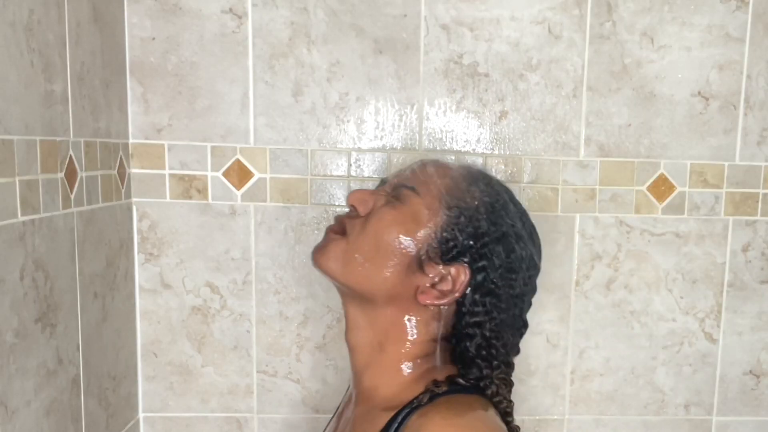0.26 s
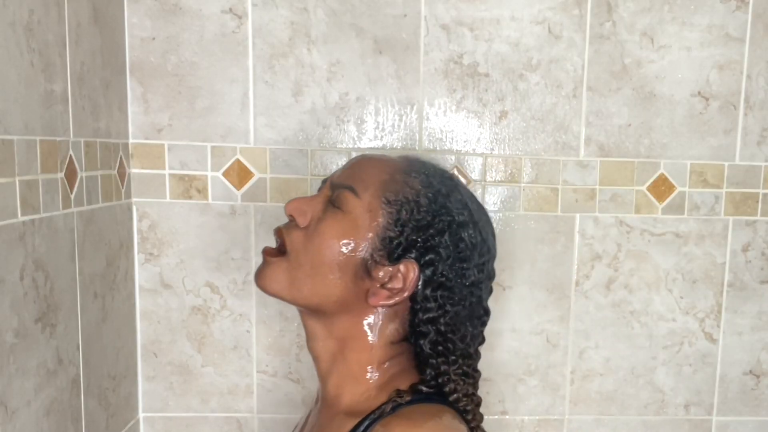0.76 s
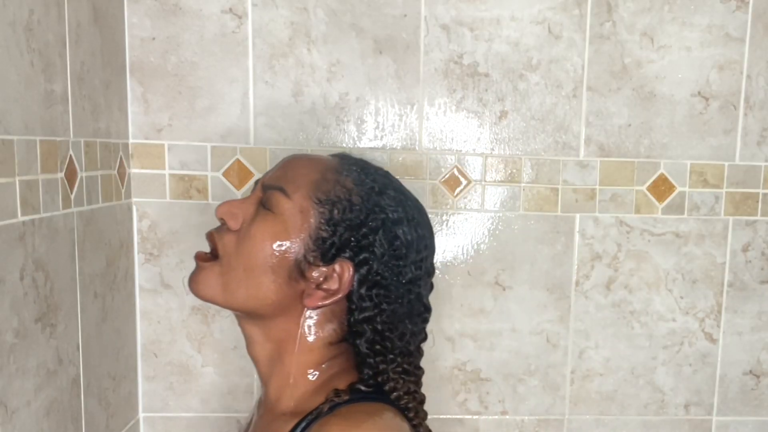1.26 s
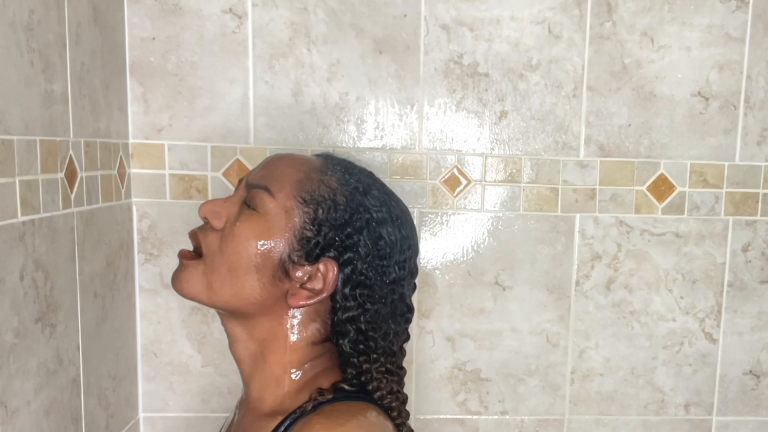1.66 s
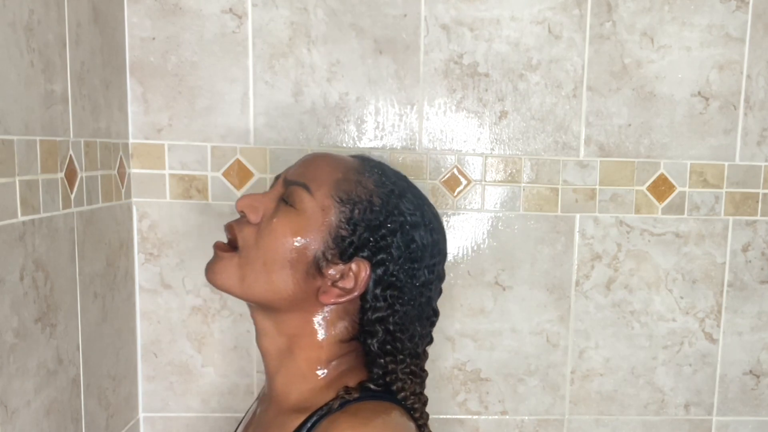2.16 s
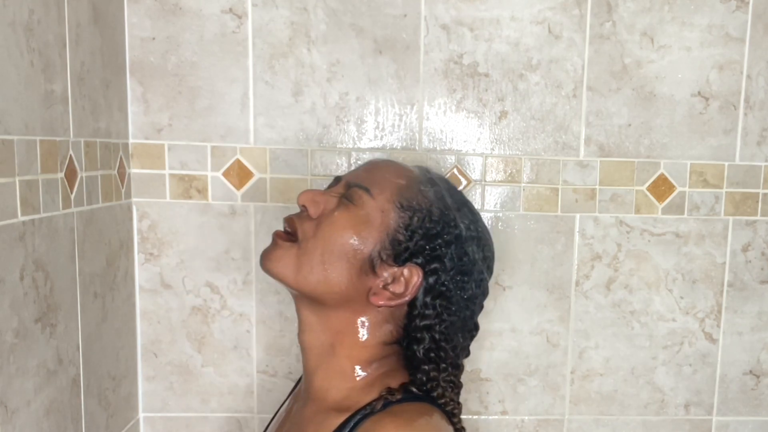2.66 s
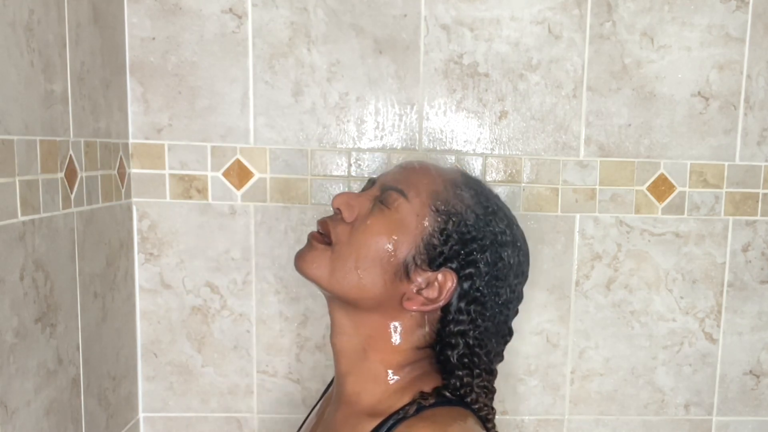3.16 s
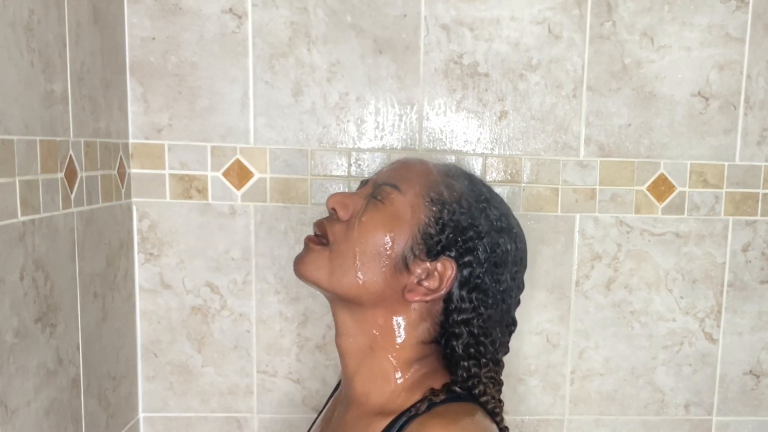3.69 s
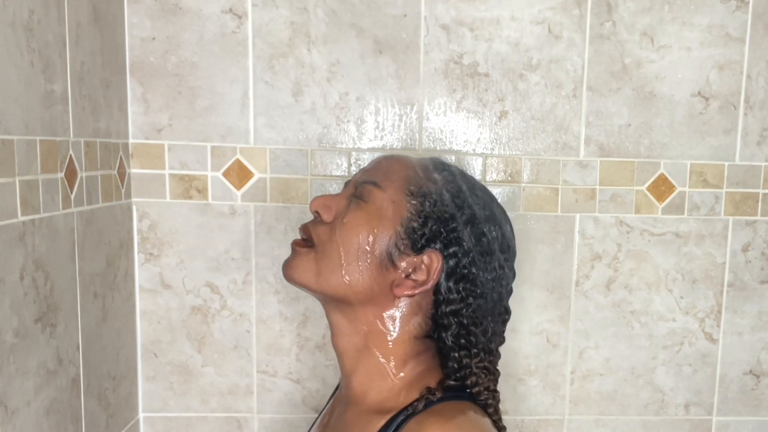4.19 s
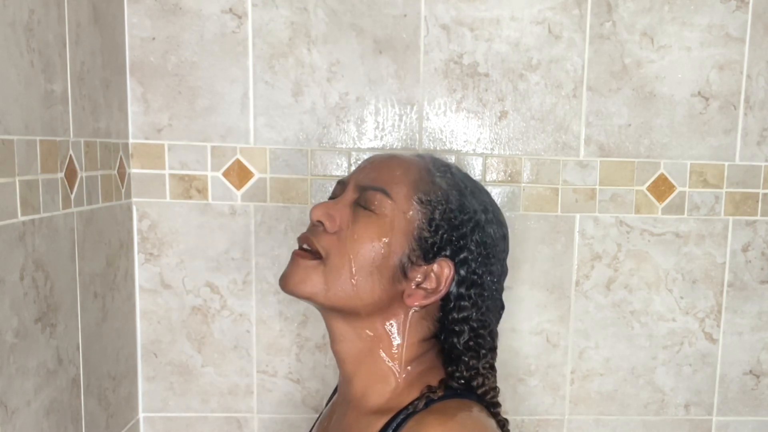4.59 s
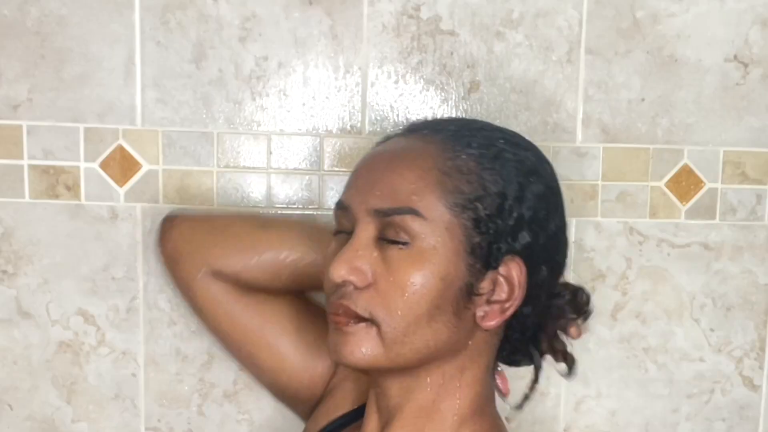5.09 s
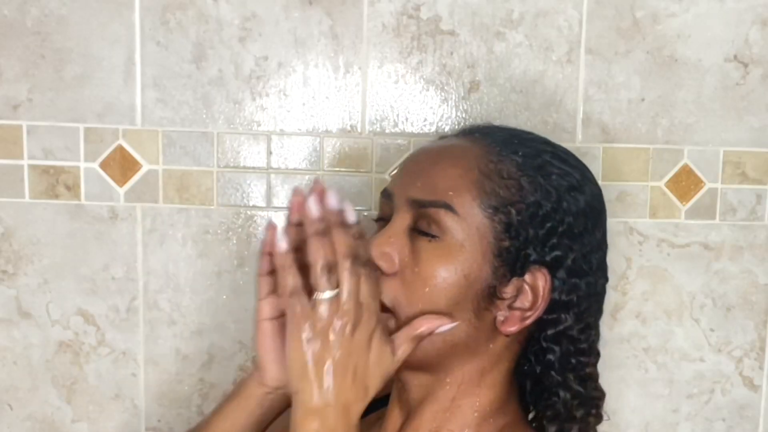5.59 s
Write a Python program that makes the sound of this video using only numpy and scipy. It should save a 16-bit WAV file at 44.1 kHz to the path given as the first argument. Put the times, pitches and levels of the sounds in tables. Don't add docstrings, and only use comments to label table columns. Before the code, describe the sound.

Bright, close shower spray with drumming runoff and splashing drops for five seconds, suddenly replaced by faint rubs and pats of wet palms.

```python
import sys
import numpy as np
from scipy import signal
from scipy.fft import rfft, irfft, next_fast_len
from scipy.io import wavfile
from scipy.ndimage import uniform_filter1d, minimum_filter1d

SR = 44100
rng = np.random.default_rng(int(sys.argv[2]) if len(sys.argv) > 2 else 0)


def amp(db):
    return 10 ** (np.asarray(db, float) / 20)


def write(x):
    x = np.atleast_2d(x).T
    wavfile.write(sys.argv[1], SR, np.round(np.clip(x, -1, 1) * 32767).astype(np.int16))


N = 257528

SPRAY_LAYER_HZ = [220, 1100, 4200, 9000]
# (frequency [Hz], density [dB per Hz])
SPRAY_COLOUR = [(40, -23.5), (80, -8.5), (120, -5), (250, -4.5), (500, -2), (700, -4), (1000, -3.5),
                (2100, -7), (2500, -10.5), (4000, -12.5), (6000, -10.5), (7500, -11.5), (10000, -9),
                (13000, -12), (16000, -15)]
# (time [s], flow running off the hair [dB], jet striking bare skin [dB])
FLOW = [(0.0, 2, 2), (0.1, -6.5, 1.5), (0.17, 0.5, 0), (0.31, -5, -2), (0.45, -3.5, -4.5), (0.67, -3, -2),
        (0.82, -1.5, -4.5), (0.95, -3.5, -3.5), (1.4, 1, 0.5), (2.0, 2.5, 2), (2.45, 2.5, -2),
        (3.15, 0, 2.5), (3.58, -2.5, -2.5), (3.8, -2.5, -2.5), (4.07, -3, -3), (4.35, -2, -2),
        (4.55, -1, -2), (5.0, -2.5, -1)]
# (share of flow [1], share of jet [1], random surge [dB])
FOLLOWS = [
    (0.83, -0.36, 0.56),
    (0.37, -0.16, .5),
    (.1, 0.78, 1.4),
    (0.91, 0.28, 1.4),
]
# (time [s], level over the drumming [dB], length [s])
GUSHES = [(.5, 2, 0.037), (.66, 5, 0.065), (.8, 9, .06), (1.03, 5, 0.073), (1.53, 4, 0.04),
          (2.0, -0.5, 0.044), (2.2, 2, 0.034), (2.45, 4, 0.086), (2.75, 0, .06), (2.95, 4, 0.16),
          (4.33, 0.5, 0.026), (4.75, 0, 0.045)]
# (start [s], end [s])
FADE = (5.058, 5.093)

# (time [s], peak level [dB], pitch [Hz], tail level [dB])
SMACKS = [(0.161, -30, 7430, -11), (0.402, -15, 6500, -2), (0.692, -25.5, 7450, -5),
          (0.786, -23.5, 7700, -5), (0.8856, -20.5, 8630, -4), (1.2116, -26.5, 8240, 1),
          (1.5246, -20.5, 8900, 1), (1.815, -14.5, 7000, -1), (2.0118, -19.5, 7800, -5.5),
          (2.2897, -14, 8500, -2.5), (2.4404, -30, 8450, 5), (2.5371, -24, 7500, -4),
          (2.5945, -16, 8600, -3.5), (2.6464, -19.5, 8650, -5), (2.8298, -20, 9300, 0),
          (3.1248, -23, 5450, -2.5), (3.3817, -22.5, 8700, -2.5), (3.695, -39, 7390, 3),
          (3.769, -14.5, 8200, -1), (4.4084, -20.5, 9350, -5), (4.5291, -22.5, 8800, -0.5),
          (4.6453, -31, 8960, -5), (4.7461, -27, 7430, -2), (4.939, -24.5, 8830, 0.5)]
# (time [s], peak level [dB])
SPITS = [(0.161, -32.5), (0.4015, -34), (0.544, -30), (0.8854, -22), (1.3139, -39.5), (1.4222, -27),
         (1.6382, -30), (1.6601, -22), (1.735, -25), (1.8148, -21), (2.0118, -24), (2.1969, -28),
         (2.2189, -35), (2.8295, -41), (3.3817, -27), (3.6581, -24), (3.695, -23), (3.7693, -24),
         (3.899, -24), (4.4084, -22), (4.6453, -37), (4.747, -23), (4.8259, -28), (4.9347, -33)]
SPIT_SOUND = 12500, .48, 4.8, .05
# (time [s], peak level [dB],
# pitch [Hz], relative width [1], tail level [dB])
PLOPS = [(.4038, -24, 4000, .2, 1), (.0887, -37, 2050, .2, -6), (.1336, -32, 2220, .2, -8),
         (.3651, -33, 1540, .25, 0), (1.292, -36, 1150, .25, -2), (3.6316, -35, 1040, .25, -2),
         (4.817, -35, 1180, .25, -2), (3.7598, -32, 7500, .4, -8), (3.7945, -27, 7600, .3, -6),
         (.4165, -31, 3000, 0.22, 2.5), (.41, -27, 5700, .22, 5.5), (3.142, -37, 3000, 0.148, 1.5),
         (.4021, -8, 8000, .32, -9.5), (1.8155, -20.5, 8000, .25, 0), (1.6, -22.5, 8300, 0.23, 0),
         (4.3165, -31.5, 3150, .06, -12), (4.3225, -30, 3300, .055, -12), (1.0251, -19, 8400, .27, 2),
         (4.4, -26, 7650, 0.11, -4.5)]
# (time [s], level over its rest [dB], length [s])
FLARES = [(.335, 7.5, .03), (1.53, 4, 0.066), (1.24, 4, .05), (2.12, 3, .06), (2.33, -5, .12),
          (2.6, 4, 0.1), (2.8, 3, .08), (3.16, 2, 0.034), (3.5, 4, .07), (3.92, 3, .06), (4.32, 5, 0.017),
          (4.4, 3, .05)]

HANDS_LAYER_HZ = [
    600,
    2200,
    6500,
    120,
]
# (frequency [Hz], density [dB per Hz])
HANDS_COLOUR = [(30, -5), (68, 1), (296, -14), (456, 0.5), (595, -18), (776, -4), (1380, -13.5),
                (1640, -15.5), (2410, -15), (6000, -26), (9500, -31), (13000, -34), (16000, -38)]
# (start [s], length [s], level [dB], brightness [dB])
RUBS = [(5.113, 0.028, -60.5, -7), (5.18, .03, -60, -9), (5.246, 0.036, -61, -11.5),
        (5.307, 0.016, -59, -8), (5.338, 0.024, -53, -8.5), (5.428, 0.034, -73, -11), (5.53, .02, -69, -20),
        (5.56, 0.03, -58.5, -11.5), (5.628, 0.038, -70, 6), (5.704, 0.019, -60, -7), (5.766, 0.032, -73, 0),
        (5.81, .03, -62.5, -6)]
STILL_DB = [
    -85,
    -111,
    -106,
    -69,
]
# (time [s], peak level [dB], cavity pitch [Hz])
CUPS = [(5.119, -53, 664), (5.188, -52.5, 685), (5.254, -58, 1400), (5.311, -50.5, 795), (5.344, -58, 775),
        (5.357, -52, 855), (5.533, -62, 750), (5.562, -50.5, 765), (5.58, -55, 800), (5.619, -57, 486),
        (5.709, -50.5, 734), (5.811, -54, 748)]
CUP_SOUND = .2, 5.5, .08
# (time [s], peak level [dB])
SLAPS = [
    (5.1128, -48),
    (5.3108, -55),
    (5.3438, -52),
    (5.562, -39.5),
    (5.7079, -56),
    (5.8112, -45),
]
SLAP_SOUND = 7000, 2, 2, -1.5
# (start [s], length [s], level [dB], centre [Hz], width [Hz])
SQUEAKS = [(5.635, 0.056, -78, 4700, 500), (5.652, .04, -78, 8700, 500), (5.768, .04, -75.5, 4000, 500),
           (5.768, .04, -79, 7300, 500), (5.254, .055, -62, 1420, 160), (5.258, .04, -66, 1020, 200),
           (5.262, .04, -68, 480, 120), (5.311, .075, -62, 460, 100), (5.345, .03, -66, 2450, 400),
           (5.563, .03, -60, 820, 200), (5.568, .1, -65, 360, 110), (5.69, .07, -67, 450, 100),
           (5.71, .012, -64, 1300, 500), (5.812, .03, -64, 750, 200)]
RUB_RISE_S, RUB_RELEASE_DB_PER_S = 0.0046, 354

# (frequency [Hz], density [dB per Hz])
RUMBLE_COLOUR = [(15, -25.5), (25, -17), (50, -13.5), (68, -3), (85, -11), (120, -30), (300, -67.5)]
# (frequency [Hz], width [Hz], level over the colour [dB])
STALL = [(66, 14, 2.5), (100, 14, 4), (142, 21, 12), (212.6, 56, 9), (325.5, 10, 12), (361.5, 16, 10),
         (461, 16, 9), (647, 14, 1.5), (774, 20, 1), (1224, 18, 4), (1417, 36, 4.5), (2203, 25, 7.5),
         (6513, 28, 9), (7000, 86, 5), (7430, 80, 12), (7810, 60, 7), (9350, 74, 3.5)]
# (frequency [Hz], time to fall 60 dB [s])
TILES = [(200, 0.62), (1000, 0.29), (4000, 0.38), (8000, 0.48), (15000, 0.12)]
# (frequency [Hz], correlation [0-1])
SAME = [(30, .85), (60, 0.6), (140, 0.97), (330, 0.52), (500, 0.38), (800, 0.033), (20000, 0.012)]
# (frequency [Hz], part [0-1])
ONE_SPOT = [(100, 0.13), (250, 0.26), (700, 0.64), (1500, 0.59), (3000, 0.65), (6000, 0.49), (16000, 0.19)]

# (frequency [Hz], share [0-1])
SHARED = [(20, 0), (6000, 0.013), (6900, .5), (7800, 0.4), (8200, 1), (20000, 1)]
# (frequency [Hz], scrambled part [0-1])
SMEAR = [(6000, 0), (8000, .4), (11000, 0.33), (15500, 0.54)]
# (frequency [Hz], threshold relative to the local mean [dB])
DROPOUT = [(2000, -30), (2500, -3.5), (2900, -4.2), (3300, -7), (3700, -4.4), (4300, -2.2), (5300, -2.2),
           (6500, -5), (16000, -12)]


def spray_layers():
    t = np.arange(0, FADE[1], .01)
    s, flow_db, jet_db = np.transpose(FLOW)
    of_flow, of_jet, surge_db = np.transpose(FOLLOWS)[:, :, None]
    layers = of_flow * np.interp(t, s, flow_db) + of_jet * np.interp(t, s, jet_db)
    layers += surge_db * waver(t, per_s=12, count=4)
    layers[0] += swells(t, GUSHES)
    return np.transpose([t, *layers])


def spray():
    water = churn(spray_layers(), SPRAY_LAYER_HZ, patchy_db=1.25, flicker_db=0.74)
    return amp(-35.5) * in_stall(water, SPRAY_COLOUR, modes_share=1)


def drops():
    smacks = [(s, db, hz, .43 + .006 * (db + 19.5), tail_db, .087) for s, db, hz, tail_db in SMACKS]
    spits = [(*row, *SPIT_SOUND) for row in SPITS]
    plops = [(*row, .1) for row in PLOPS]
    return hits(smacks + spits + plops, wet_db=8.0, early=0.78)


def droplets(per_s=120, spread_db=10.0, low_hz=4500, top_hz=11000, level_db=-52, wet_db=13.5):
    size = amp(np.minimum(spread_db * rng.exponential(1, N), 18))
    size *= rng.random(N) < per_s / SR
    band = signal.butter(2, [low_hz, top_hz], "band", fs=SR, output="sos")
    ticks = signal.sosfilt(band, size * rng.choice([-1., 1.], N))
    room = signal.fftconvolve(ticks[None], tiles(gap_s=.002), axes=1)[:, :N]
    return amp(level_db) * evened(ticks + amp(wet_db) * room)


def whistle():
    t = np.arange(N) / SR
    s = t[::200]
    db = -54 + 1.2 * waver(s, per_s=6.0, count=1)[0] + swells(s, FLARES)
    r = np.exp(-np.pi * 24 / SR)
    slow = signal.lfilter([1 - r], [1, -r], complex_noise(N))
    slow = slow / abs(slow) ** .65
    return np.interp(t, s, amp(db)) * evened((slow * np.exp(2j * np.pi * 3295 * t)).real)


def rub_layers():
    t = np.arange(FADE[1], N / SR, .002)
    start, length, db, bright_db = np.transpose(RUBS)[:, :, None]
    stroke = amp(db) * stroke_shape(t, start, length)
    power = [(stroke ** 2 * amp(2 * share * bright_db)).sum(0) for share in (0, 0.36, 1)]
    power.append(0 * t)
    still = amp(2 * np.array(STILL_DB))[:, None]
    return np.transpose([t, *10 * np.log10(power + still)])


def rubbing():
    rub = churn(rub_layers(), HANDS_LAYER_HZ, patchy_db=3.0, flicker_db=2.0) * (np.arange(N) / SR > FADE[1])
    return amp(-69.5) * in_stall(rub, HANDS_COLOUR, modes_share=0.57)


def palms():
    cups = [(*row, *CUP_SOUND) for row in CUPS]
    slaps = [(*row, *SLAP_SOUND) for row in SLAPS]
    return hits(cups + slaps, wet_db=1.0, early=.1)


def squeaks():
    t, out = np.arange(N - SR, N) / SR, 0
    for s, length, db, hz, width in SQUEAKS:
        r = np.exp(-np.pi * width / SR)
        slow = signal.lfilter([1], [1, -2 * r, r * r], complex_noise(SR))
        tone = evened((slow * np.exp(2j * np.pi * hz * t)).real)
        out = out + amp(db) * stroke_shape(t, s, length) * tone
    return np.pad(out, ((0, 0), (N - SR, 0)))


def stroke_shape(t, start, length):
    release_db = RUB_RELEASE_DB_PER_S * np.maximum(t - start - length, 0)
    return np.clip((t - start) / RUB_RISE_S, 0, 1) * amp(-release_db)


def rumble():
    t = np.arange(N) / SR
    db = -59.5 - 1.5 * t + swells(t, [(0, 12.5, 0.099)])
    return amp(db) * in_stall(rng.standard_normal((3, N)), RUMBLE_COLOUR, modes_share=0)


def microphone_hiss():
    return amp(-86) * rng.standard_normal((2, N))


def churn(rows, centres, patchy_db, flicker_db):
    frames, hz = N // 128 + 5, np.fft.rfftfreq(512, 1 / SR)
    s, *levels = np.transpose(rows)
    t = np.arange(frames) * 128 / SR
    layers = np.array([np.interp(t, s, v - np.mean(v)) for v in levels])
    share = np.array([read(sorted(zip(centres, one)), hz) for one in np.eye(len(centres))])
    *parts, patches, flicker = rng.standard_normal((frames, 257, 8)).T
    patches = evened(uniform_filter1d(uniform_filter1d(patches, size=7, axis=0), size=20, axis=1))
    flicker = evened(uniform_filter1d(uniform_filter1d(flicker, size=70, axis=0), size=3, axis=1))
    noise = np.array(parts[:3]) + 1j * np.array(parts[3:])
    z = noise * amp(share.T @ layers + patchy_db * patches + flicker_db * flicker)
    return signal.istft(z, nperseg=512, noverlap=384)[1][:, :N]


def hits(rows, wet_db, early):
    out = np.zeros((2, N + SR))
    rooms = [tiles(gap_s=.0005, early=early) for _ in range(8)]
    for k, (s, db, hz, spread, tail_db, fall) in enumerate(rows):
        spread, fall = np.clip(spread, .05, 2), np.clip(fall, 0, .6)
        u = np.arange(-2.5, 14, hz * spread * np.pi / SR)
        late = np.maximum(u, 0)
        onset = np.exp(-np.minimum(u, 0) ** 2)
        decay = (1 - fall) * np.exp(-late ** 2) + fall * np.exp(-late / 2.1)
        phase = np.cumsum(2 * np.pi * hz / SR * (1 - fall * np.tanh(late / 5.1)))
        burst = amp(db) * onset * decay * np.cos(phase)
        room = signal.fftconvolve(burst[None], rooms[k % len(rooms)], axes=1)
        sound = amp(wet_db + tail_db) * room
        sound[:, :len(u)] += burst
        start = round((s + .0011 - .6 / (hz * spread)) * SR)
        out[:, start:][:, :sound.shape[1]] += sound
    return out[:, :N]


def in_stall(x, colour, modes_share):
    hz = np.fft.rfftfreq(N, 1 / SR)
    modes_db = sum(db / (1 + (2 * (hz - f) / width) ** 2) for f, width, db in STALL)
    echoes = rfft(tiles(gap_s=0.001006), N)
    echoes /= np.sqrt(uniform_filter1d(abs(echoes) ** 2, size=3000, axis=1))
    spot = np.clip(read(ONE_SPOT, hz), 0, 1)
    z = rfft(x) * amp(read(colour, hz) + modes_share * modes_db)
    left, other = np.sqrt(1 - spot ** 2) * z[:2] + spot * echoes * z[2]
    same = np.clip(read(SAME, hz), 0, 1)
    right = same * left + np.sqrt(1 - same ** 2) * other
    return evened(irfft(np.array([left, right]), N))


def tiles(gap_s, early=0.72, early_s=0.0064):
    echoes = np.zeros((2, SR // 3))
    at = np.arange(round(gap_s * SR), SR // 3 - 12, 12)
    at = at + rng.integers(0, 12, (2, len(at)))
    strength = 1 + early * np.exp(-at / SR / early_s)
    np.put_along_axis(echoes, at, rng.choice([-1., 1.], at.shape) * strength, 1)
    hz, t, z = signal.stft(echoes, SR, nperseg=256)
    tail = signal.istft(z * amp(-60 * t / read(TILES, hz)[:, None]), SR, nperseg=256)[1]
    return tail / np.linalg.norm(tail[0])


def waver(t, per_s, count):
    hz = np.geomspace(.5, per_s, 24)[:, None]
    phases = rng.random((count, 24))
    return np.array([evened((np.sin(2 * np.pi * (hz * t + p[:, None])) / hz ** 0.14).sum(0)) for p in phases])


def swells(t, rows):
    return sum(db * np.exp(-((t - at) / length) ** 2) for at, db, length in rows)


def complex_noise(n):
    return rng.standard_normal((2, n)) + 1j * rng.standard_normal((2, n))


def evened(x):
    return x / np.sqrt(np.mean(x ** 2) + 1e-20)


def read(points, hz):
    f, value = np.transpose(points)
    return np.interp(np.log(hz + 1), np.log(f + 1), value)


def scene():
    t = np.arange(N) / SR
    shower = spray() + drops() + droplets() + whistle() + rumble()
    hands = rubbing() + palms() + squeaks() + microphone_hiss()
    return shower * np.interp(t, FADE, [1, 0]) + hands * (t > FADE[1])


def low_pass(x):
    return signal.sosfilt(signal.butter(12, 16370, fs=SR, output="sos"), x)


def record(dry):
    size = next_fast_len(N + 4096)
    hz = np.fft.rfftfreq(size, 1 / SR)
    left, right = rfft(dry, size) * np.clip((15830 - hz) / 250, 0, 1)
    shared = np.clip(read(SHARED, hz), 0, 1)
    lead = np.exp(2j * np.pi * (hz - 12197) / 3976)
    right = np.sqrt(1 - shared ** 2) * right + shared * lead * left
    mid_side = irfft(np.array([left + right, left - right]) / 2, size)[:, :N]
    f, t, z = signal.stft(mid_side, SR, nperseg=1024)
    smear = np.clip(read(SMEAR, f), 0, 1)[:, None]
    z[1] *= np.sqrt(1 - smear ** 2) + smear * 1j * rng.choice([-1., 1.], z[1].T.shape).T
    cell = uniform_filter1d(uniform_filter1d(abs(z) ** 2, size=4, axis=1), size=3, axis=2)
    around = minimum_filter1d(uniform_filter1d(cell, size=25, axis=1), size=5, axis=2)
    around = uniform_filter1d(around, size=5, axis=2)
    threshold = around * (t < FADE[1]) * amp(2 * read(DROPOUT, f))[:, None]
    z *= np.clip(7 * (cell / (threshold + 1e-30) - 1), .03, 1)
    mid, side = signal.istft(z, SR, nperseg=1024)[1][:, :N]
    return low_pass(np.array([mid + side, mid - side]))


dry = scene()
out = record(dry)
write(out)
```